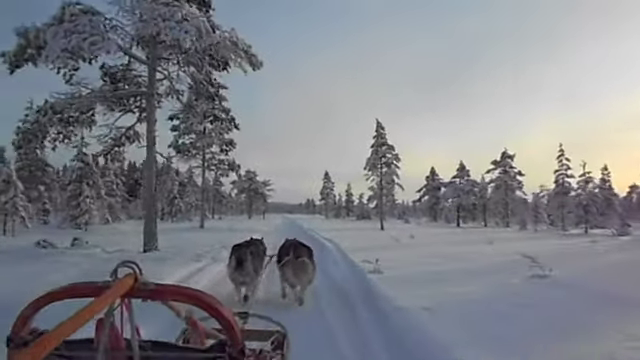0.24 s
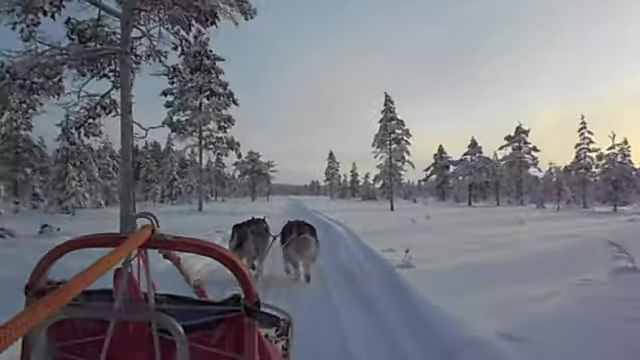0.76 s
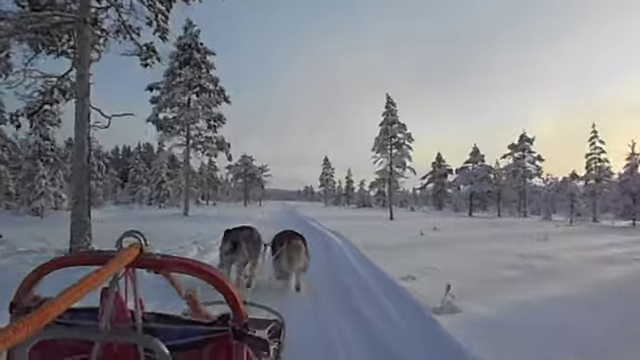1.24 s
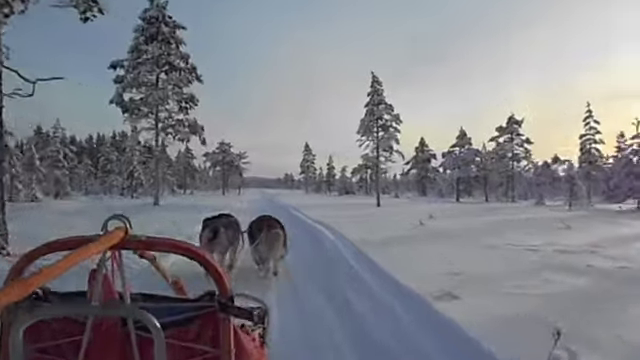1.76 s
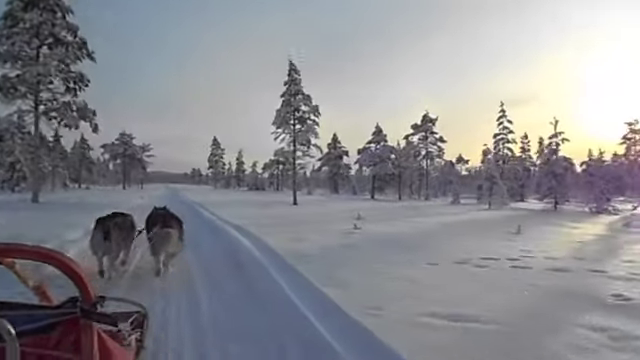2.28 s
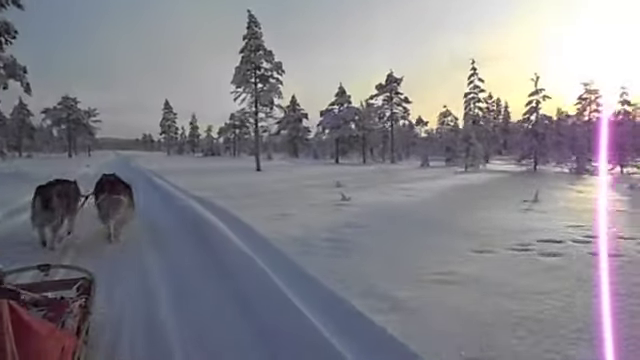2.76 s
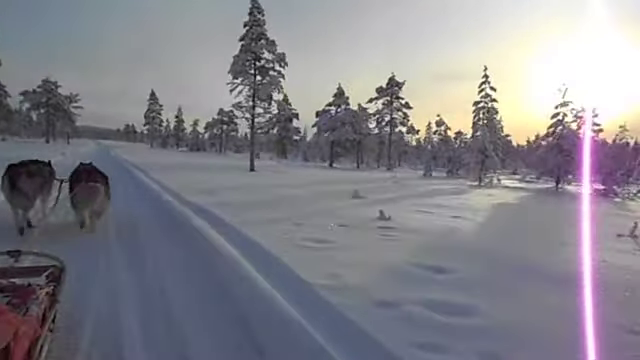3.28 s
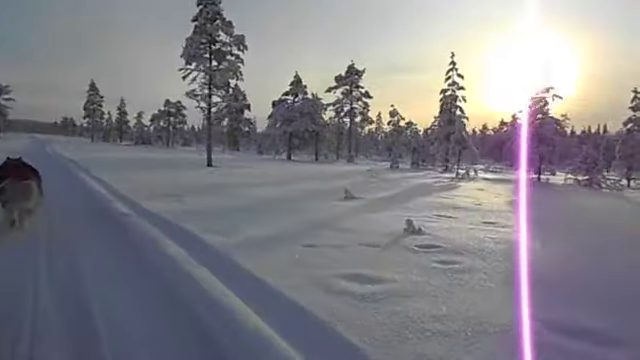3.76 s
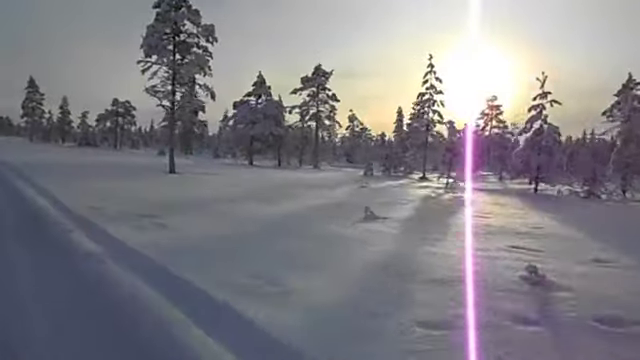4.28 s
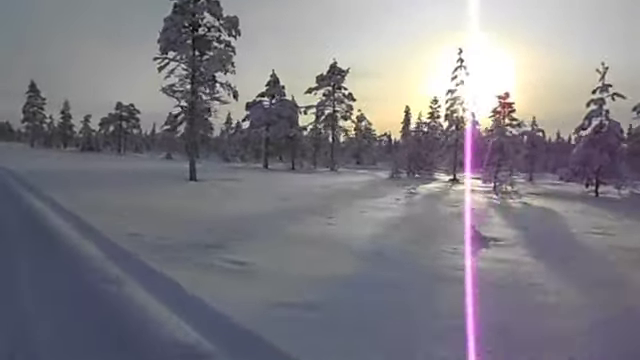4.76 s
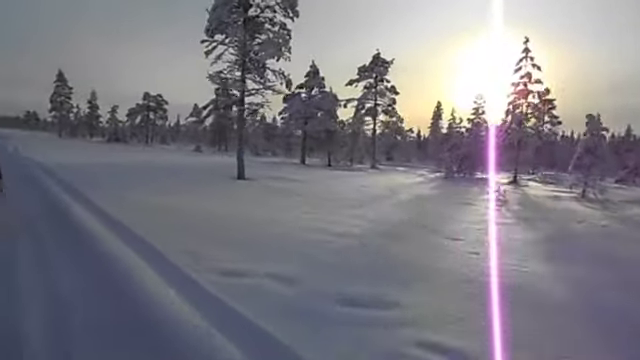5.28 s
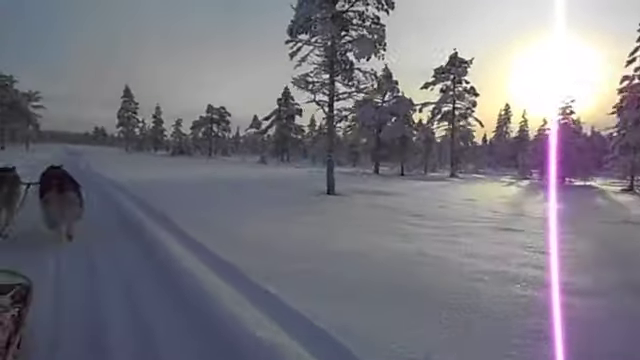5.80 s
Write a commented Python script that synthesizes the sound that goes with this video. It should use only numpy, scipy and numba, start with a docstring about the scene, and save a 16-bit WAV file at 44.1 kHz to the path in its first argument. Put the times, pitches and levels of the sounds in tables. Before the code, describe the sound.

Sled runners hiss and crunch over packed snow while gusty headwind buffets the microphone, fading midway as the snow crackle grows crisper and louder.

```python
"""The runners of a dog sled hiss over packed snow, and crust crunches under runners and paws.
The snow is filtered noise and random clicks; breaking slabs add short notes, the sled floor a low drone.
Headwind buffets the bare microphone of a small camera on board: filtered noise in gusts, plus single thumps.
The wind fades as the microphone turns aside, and picks up again near the end."""
import sys
import numpy as np
from scipy import signal
from scipy.fft import rfft, irfft, next_fast_len
from scipy.io import wavfile
from scipy.ndimage import uniform_filter1d
from numba import njit

SR = 44100
rng = np.random.default_rng(int(sys.argv[2]) if len(sys.argv) > 2 else 0)


def master(y):
    """Save y as 16-bit WAV."""
    cut = np.clip(np.atleast_2d(y).T, -1, 1)
    pcm = np.round(cut * 32767)  # scale
    wavfile.write(sys.argv[1], SR, pcm.astype(np.int16))


N = 266364  # length of the scene in samples

# Runners gliding on the snow, before the snow colours the sound.
# Each row: time in seconds, level in dB.
GLIDE = [(0.0, -33), (0.25, -33), (0.45, -38), (1.55, -27.5), (2.42, -29.5), (2.48, -36), (2.76, -30.5),
         (2.8, -28), (3.2, -28), (3.9, -24.5), (4.36, -25.5), (4.88, -23.5), (5.28, -26.5), (5.62, -27),
         (5.74, -23.5), (6.04, -26)]
# Crust breaking under runners and paws; the crunch level is before the snow colours the sound.
# Each row: start in seconds, crunch level in dB, note pitch in Hz, note peak in dB, rise scale in seconds.
CRUNCHES = [(0.037, -29.5, 810, -35, .003), (.213, -38, 1100, -40, 0.0068), (.237, -35, 1150, -29, .005),
            (0.519, -34, 915, -42, 0.014), (.581, -34, 830, -41, 0.006), (0.837, -33.5, 905, -37, 0.01),
            (.874, -29.5, 930, -39, 0.0027), (.952, -33, 1020, -30, 0.017), (1.094, -33, 1930, -34, 0.012),
            (1.177, -26, 915, -32, 0.0024), (1.217, -35, 1130, -33, 0.018), (1.424, -43, 1610, -33, 0.0083),
            (1.464, -32, 826, -27, 0.012), (1.726, -33, 1050, -23, 0.0035),
            (1.797, -31, 820, -24.5, 0.0087), (2.411, -34, 697, -25, 0.015), (2.792, -36, 1040, -32, 0.032),
            (2.868, -39, 894, -38, 0.0074), (3.089, -30, 1080, -34, 0.0087),
            (3.265, -47, 1680, -32, 0.0035), (3.282, -25, 825, -47, 0.0069), (3.397, -33, 1050, -26, 0.019),
            (3.479, -31, 1040, -43, 0.0099), (3.527, -26, 1110, -31, 0.017),
            (3.619, -24.5, 864, -43, 0.0031), (3.685, -23, 885, -43, 0.0048),
            (3.769, -23, 848, -40, 0.0034), (3.811, -31, 834, -25, 0.0032), (3.838, -51, 1650, -25, 0.0046),
            (3.868, -43, 964, -44, 0.0037), (3.924, -30, 970, -30, 0.012), (4.145, -35, 840, -33, 0.0042),
            (4.214, -23, 890, -27, 0.0058), (4.278, -35, 810, -40, 0.015), (4.332, -32, 900, -45, 0.0061),
            (4.352, -24, 1090, -46, 0.0099), (4.441, -29, 1120, -32, .006),
            (4.552, -38, 740, -29.5, 0.0056), (4.752, -38, 1020, -42, 0.031),
            (4.949, -16.5, 790, -24, 0.0036), (5.006, -31, 850, -36, 0.0079),
            (5.044, -29, 820, -30, 0.0044), (5.089, -32, 860, -45, 0.015), (5.137, -32, 900, -39, 0.0083),
            (5.156, -20.5, 870, -29, 0.0032), (5.429, -26.5, 1110, -34, 0.0054),
            (5.513, -19, 920, -36, 0.0054), (5.552, -28.5, 1990, -27, 0.015),
            (5.644, -27, 1150, -44, 0.0032), (5.701, -26, 920, -43, 0.0053), (5.871, -27, 975, -31, 0.014),
            (5.896, -40, 1960, -26, 0.033), (6.014, -32, 842, -39, .013)]
# Tone colour of the snow. Each row: frequency in Hz, gain in dB.
SNOW_COLOUR = [(150, -11), (350, -7), (600, -2.5), (900, -1), (1250, -1.5), (1500, -8), (1800, -6),
               (2600, -8), (3500, -9), (4600, -6.5), (5200, -5.5), (5900, -3.5), (6500, -6.5), (8000, -7.5),
               (10500, -0.5)]
# Ringing of frame and runners. Each row: centre in Hz, width in Hz, average gain in dB.
SLED_RINGS = [(844, 270, -11.5), (1605, 47, -6), (3117, 17, -4.5), (7600, 100, -6.5)]
# Where the small ice grains sound. Each row: centre in Hz, width in Hz.
TICK_BANDS = [(3300, 3560), (7700, 1500)]
# Small ice grains crack at random: average count, level setting over the glide, fade time in seconds.
TICKS_PER_S, TICK_DB, TICK_S = 30, -0.5, 0.0037
# Boost of the fine crackle, growing as the snow hardens.
BRIGHT_DB, BRIGHTER_DB_PER_S = 2.5, 0.5
RUMBLE_HZ, RUMBLE_DB = 50, -69  # runners drumming over the uneven track

# Gusts of headwind at the microphone.
# Each row: start in seconds, length in seconds, level setting in dB, rough edge in dB over that level.
GUSTS = [(0.0, 0.12, -20, -17.5), (0.136, 0.025, -17.5, -21), (0.209, 0.15, -19, -13.5),
         (0.408, 0.028, -19.5, -11), (0.493, 0.062, -25.5, -16), (0.562, 0.097, -24.5, -19.5),
         (0.662, 0.071, -24.5, -12.5), (0.758, 0.076, -32.5, -12.5), (0.866, 0.2, -25.5, -15),
         (1.281, 0.254, -20, -19), (1.538, 0.096, -20, -13), (1.641, 0.027, -25, -18),
         (1.718, 0.164, -22, -15.5), (1.886, 0.047, -14.5, -13.5), (1.932, 0.12, -22.5, -11.5),
         (2.055, 0.077, -21, -14.5), (2.2, 0.043, -30, -14), (2.287, .02, -24, -9),
         (2.38, 0.09, -19.5, -13.5), (2.484, .07, -37, -7.5), (2.621, .04, -34, -33),
         (2.69, 0.055, -31.5, -12), (2.758, 0.035, -24.5, -11.5), (2.868, 0.123, -24, -21),
         (3.16, 0.091, -41.5, -12), (3.292, 0.064, -37, -18), (3.45, 0.26, -45, -16),
         (3.986, 0.146, -31, -30), (5.631, 0.111, -29, -18), (5.736, .11, -27, -19),
         (5.915, 0.043, -26, -8)]
GUST_RISE_S, GUST_FALL_S = 0.024, 0.023
# Breeze between the gusts. Each row: time in seconds, level setting in dB.
BREEZE = [(0, -33.5), (1.2, -37.5), (2.3, -39.5), (2.95, -41), (3.05, -49.5), (5.3, -51), (5.6, -45),
          (6.04, -35)]
BREEZE_EDGE_DB = -18  # rough edge over the breeze level
# Single eddies that thump the membrane.
# Each row: start in seconds, strength in dB before shaping, pitch in Hz.
THUMPS = [(0.143, -21.5, 137), (0.236, -17.5, 89), (0.269, -7, 178), (0.308, -11, 170), (0.412, -11.5, 83),
          (0.871, -19, 159), (1.023, -19.5, 503), (1.029, -16, 136), (1.293, -16, 169), (1.459, -11, 305),
          (1.499, -10.5, 202), (1.554, -8.5, 187), (1.591, -9, 94), (1.801, -11, 218), (1.898, -13, 128),
          (1.916, -11, 157), (2.015, -14, 92), (2.091, -12, 134), (2.283, -21.5, 81), (2.435, -6.5, 225),
          (2.492, -17, 133), (2.706, -17.5, 112), (2.884, -13, 186), (2.967, -21, 120), (4.013, -22, 149),
          (5.764, -15, 137), (5.834, -31, 92), (5.933, -10.5, 185)]

AVERAGE = 8  # samples that the converter averages
TOP_HZ = 10900  # the converter cuts what lies above


def undb(db):
    """Turns dB into a plain gain."""
    return 10 ** (np.asarray(db) / 20)


def level(x, db):
    """Scales x to an average (RMS) level in dB."""
    return x * undb(db) / np.sqrt(np.mean(x ** 2))


def curves(table):
    """Draws straight lines between the rows of a table, one curve for each column after the time."""
    s, *columns = np.transpose(table)
    return [np.interp(np.arange(N) / SR, s, column) for column in columns]


@njit
def svf(x, hz, damp):
    """State-variable filter with a moving centre: gives band-pass and low-pass."""
    band_out, low_out = np.empty(len(x)), np.empty(len(x))
    b, l = 0., 0.
    for i in range(len(x)):
        g = np.tan(np.pi * hz[i] / SR)
        v = (b + g * (x[i] - l)) / (1 + g * (g + damp))
        band_out[i] = damp * v
        low_out[i] = l + g * v
        b, l = 2 * v - b, l + 2 * g * v
    return band_out, low_out


def band(x, hz, width):
    """Keeps one fixed band of x."""
    return svf(x, np.full(len(x), 1. * hz), width / hz)[0]


def high_pass(x, order, hz):
    """Removes what lies below hz."""
    return signal.sosfilt(signal.butter(order, hz, "high", fs=SR, output="sos"), x)


def walk(rate):
    """Random wandering: values held for 1 / rate seconds, then smoothed twice."""
    hold = int(SR / rate)
    steps = np.repeat(rng.standard_normal(N // hold + 1), hold)
    return 0.95 * uniform_filter1d(uniform_filter1d(steps, hold), hold)[:N]


def colour(x, points):
    """Shapes the spectrum of x with gains in dB at given frequencies."""
    hz, db = np.transpose(points)
    size = next_fast_len(N)
    f = np.maximum(np.fft.rfftfreq(size, 1 / SR), 1)
    gain = undb(np.interp(np.log(f), np.log(hz), db))
    return irfft(rfft(x, size) * gain, size)[:N]


def grains(per_s, scatter_db):
    """Sparse clicks of either sign and uneven size."""
    chance, side = rng.random((2, N))
    size = undb(scatter_db * np.clip(rng.standard_normal(N), -2, 2))
    return (chance < per_s / SR) * np.sign(side - 0.5) * size


def snow():
    """Crystals shatter under the runners: a dense glide, uneven patches, and loud breaks of the crust."""
    glide_db = curves(GLIDE)[0]
    crystals = rng.standard_normal(N) + 0.5 * level(grains(1500, 4.8), 0)
    patches_db = 0.38 * walk(10) + 1.28 * walk(45)
    ticks = crystals * tick_envelope(glide_db)
    breaks = crystals * crunch_envelope() + sum(band(ticks, hz, width) for hz, width in TICK_BANDS)
    # hard crust cracks brighter than loose snow, and knocks the runners
    bright_crack = undb(-3.0) * band(breaks, 5250, 5700)
    breaks = breaks + bright_crack
    knock = undb(1.0) * band(breaks - bright_crack, 3100, 180)
    force = crystals * undb(glide_db + patches_db) + breaks + knock
    sound = colour(force + sled_ring(force), SNOW_COLOUR)
    # grain size changes along the track, so coarse and fine crackle flicker apart
    coarse_change = band(sound, 4300, 1600) * (undb(1.76 * walk(40)) - 1)
    bright_db = BRIGHT_DB + BRIGHTER_DB_PER_S * np.arange(N) / SR
    fine_gain = undb(bright_db + 1.1 * walk(35))
    return sound + coarse_change + (fine_gain - 1) * high_pass(sound, 4, 5500)


def crunch_envelope():
    """Loudness of all crunches: the break spreads for some milliseconds, then the crumbs die away."""
    envelope = np.zeros(N + SR)
    t = np.arange(SR // 5) / SR
    for s, db, _, _, rise_s in CRUNCHES:
        i = int(s * SR)
        u = t / max(rise_s, 0.001)
        envelope[i:i + len(t)] += undb(db) * u * np.exp((1 - u ** 1.27) / 0.86)
    return envelope[:N]


def tick_envelope(glide_db):
    """Loudness of cracking ice grains: each random click swells and fades, following the glide."""
    fade = np.exp(-1 / (TICK_S * SR))
    clicks = np.abs(grains(TICKS_PER_S, 2.0))
    # filtering both ways smooths each click forward and backward in time
    smooth = signal.filtfilt([1], [1, -fade], clicks) * (1 - fade ** 2)
    return smooth * undb(glide_db + TICK_DB)


def sled_ring(force):
    """Frame and runners ring when shaken; each part is shaken by its own bumps."""
    return sum(undb(db + 2.5 * walk(30)) * band(force, hz, width) for hz, width, db in SLED_RINGS)


def notes():
    """Each breaking slab rings for a moment on a pitch of its own, with an unsteady tone."""
    out = np.zeros(N + SR)
    t = np.arange(SR // 40) / SR
    u = t / 0.0022  # the note peaks after 2.2 ms
    wobbles = rng.standard_normal((len(CRUNCHES), len(t)))
    for (s, _, hz, db, _), wobble in zip(CRUNCHES, wobbles):
        i = int(s * SR)
        phase = 2 * np.pi * hz * t + 0.13 * np.cumsum(wobble)
        out[i:i + len(t)] += undb(db) * u * np.exp(1 - u) * np.sin(phase)
    return out[:N]


def rumble():
    """The runners drum over the uneven track: a low, wavering drone through the sled floor."""
    drone = band(rng.standard_normal(N), RUMBLE_HZ, 60)
    return level(drone * undb(2.6 * walk(5)), RUMBLE_DB)


def wind():
    """Eddies of uneven size push the membrane, faster in strong gusts; small ones ride on as a rough edge."""
    gain, edge_gain = gusts()
    gain_db = 20 * np.log10(gain)
    hz = np.clip(150 * undb(0.26 * (gain_db + 35.5) + 2.8 * walk(30)), 40, 900)
    push = level(grains(600, 3.74), 0) + 0.45 * rng.standard_normal(N)
    # two low-passes in a row leave the deep push
    body = svf(svf(push, hz, 1.9)[1], 1.22 * hz, 0.75)[1]
    body = high_pass(body, 2, 40) / np.sqrt(hz)
    # a band-pass and two low-passes leave the rough edge
    edge = svf(push, 2.22 * hz, 0.31)[0]
    edge = svf(edge, 6.2 * hz, 2.26)[1]
    edge = svf(edge, 7 * hz, 1.34)[1] / np.sqrt(hz)
    flutter = undb(1.4 * walk(26.02))
    return flutter * (gain * level(body, -5.5) + edge_gain * level(edge, 0))


def gusts():
    """Each gust rises and falls over the breeze; gives the gain of the wind and of its rough edge."""
    t = np.arange(N) / SR
    gain = undb(curves(BREEZE)[0])
    edge = gain * undb(BREEZE_EDGE_DB)
    for s, length_s, db, edge_db in GUSTS:
        rise = (t - s) / GUST_RISE_S
        fall = (s + length_s - t) / GUST_FALL_S
        # start and end lie halfway up the ramps
        shape = np.clip(np.minimum(rise, fall) + 0.5, 0, 1) ** 2
        gain = gain + undb(db) * shape
        edge = edge + undb(db + edge_db) * shape
    return gain, edge


def thumps():
    """Single eddies hit the membrane: each is about one cycle of pressure, inward first."""
    out = np.zeros(N + SR)
    for s, db, hz in THUMPS:
        turn = np.arange(int(2.5 * SR / hz)) * hz / SR  # cycles since the start
        i = int(s * SR)
        swell = np.exp(-((turn - 0.6) / 0.34) ** 2)
        out[i:i + len(turn)] -= undb(db) * np.sin(2 * np.pi * turn) * swell
    return out[:N]


def scene():
    """Adds all the sources into one channel."""
    return (snow() + notes() + rumble() + wind() + thumps())[None]


def record(dry):
    """The converter averages neighbouring samples, which leaves a notch mid-treble, and cuts the top."""
    smooth = signal.lfilter(np.ones(AVERAGE) / AVERAGE, 1, dry)
    return signal.sosfilt(signal.ellip(12, 0.2, 70, TOP_HZ, fs=SR, output="sos"), smooth)


dry = scene()
out = record(dry)
master(out)
```